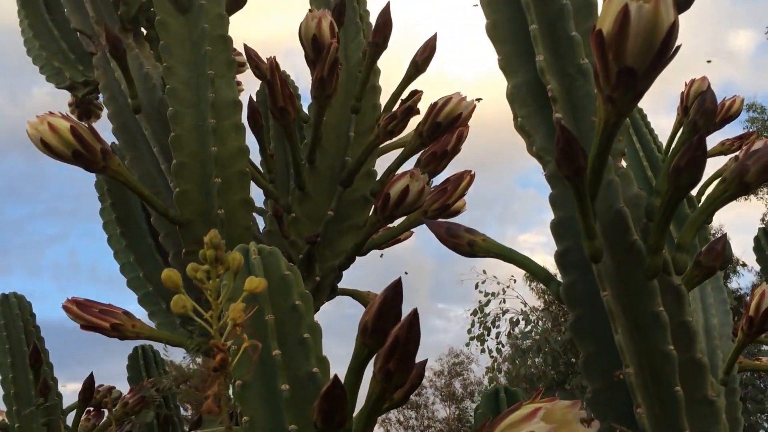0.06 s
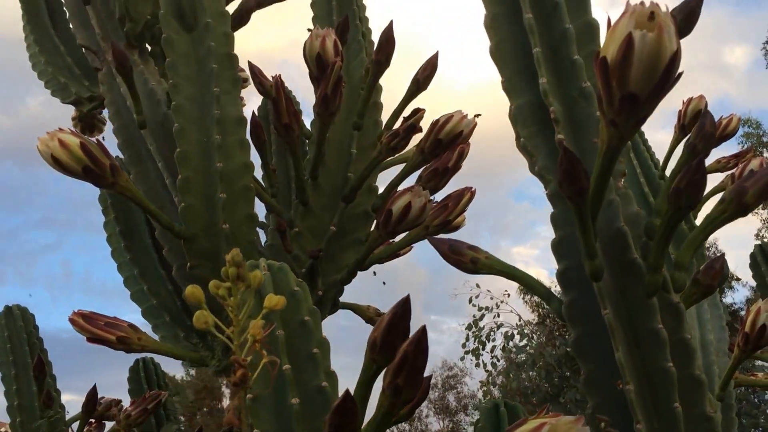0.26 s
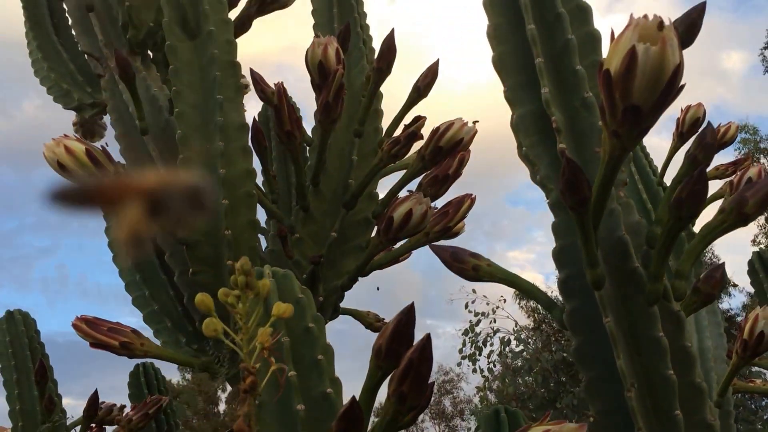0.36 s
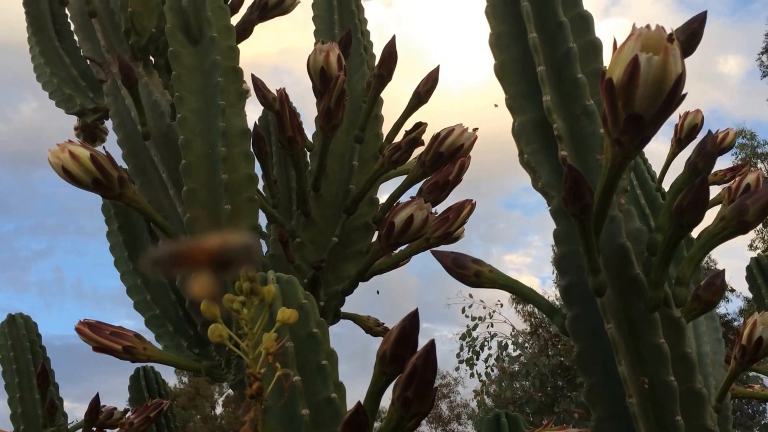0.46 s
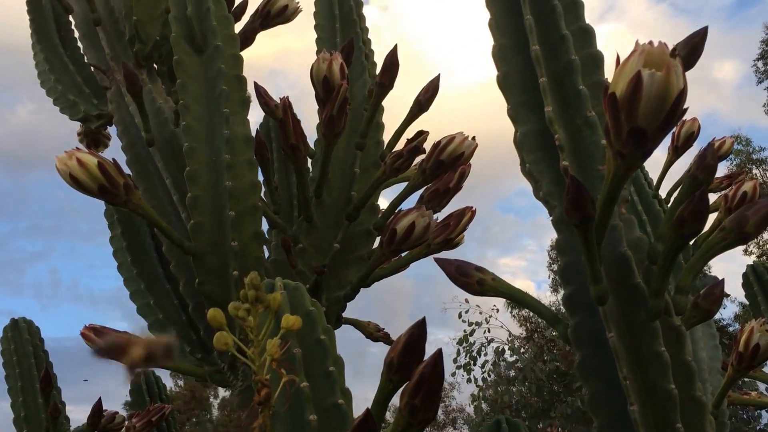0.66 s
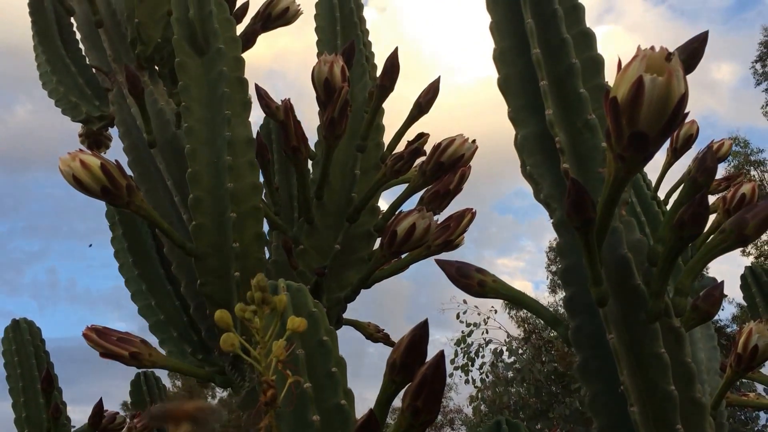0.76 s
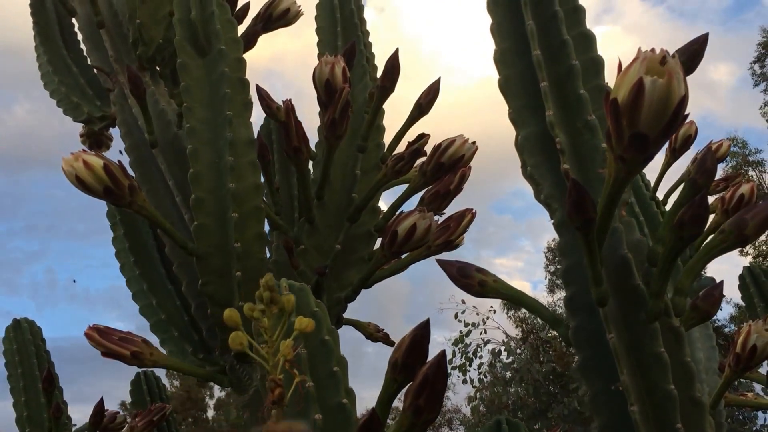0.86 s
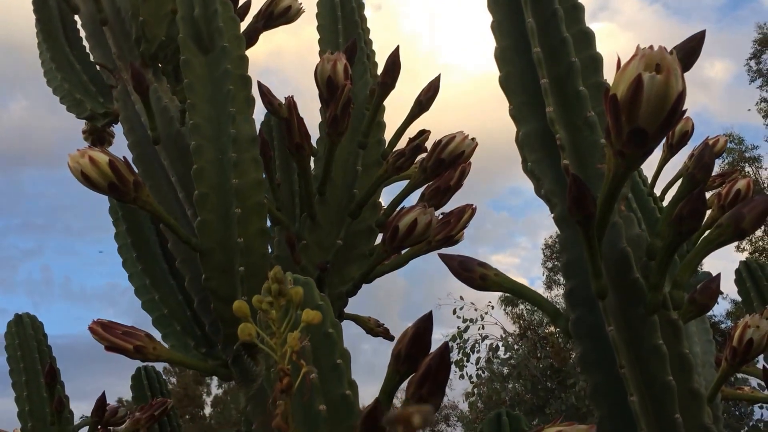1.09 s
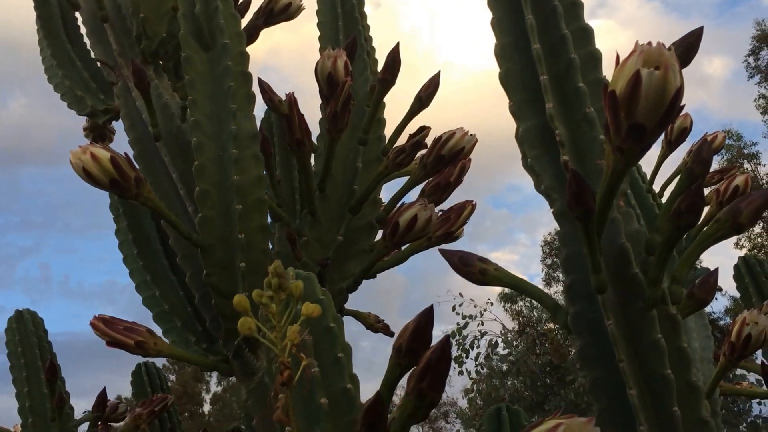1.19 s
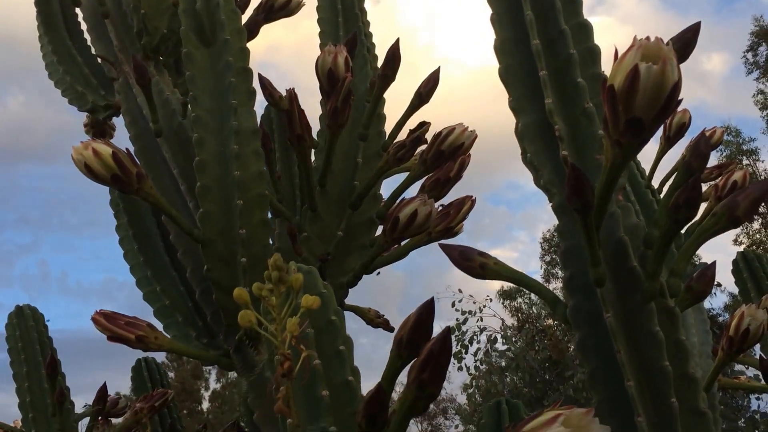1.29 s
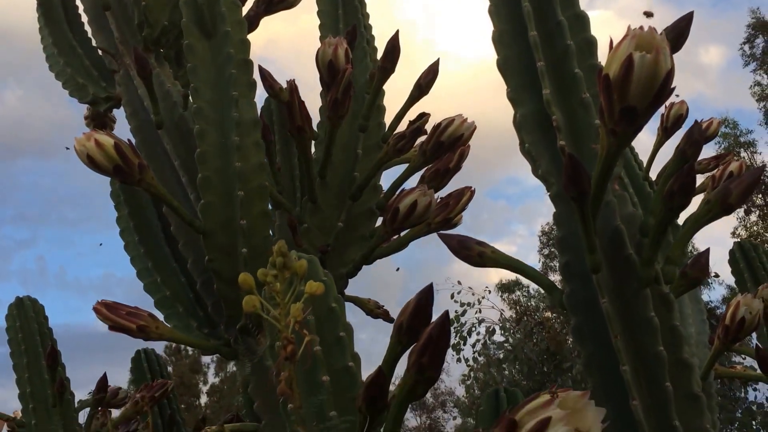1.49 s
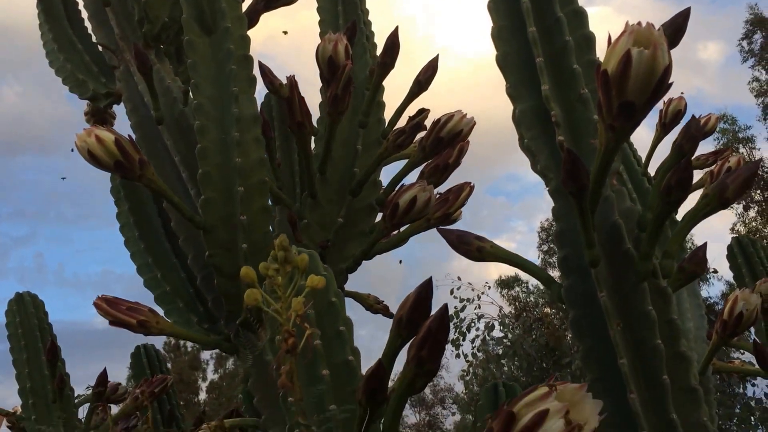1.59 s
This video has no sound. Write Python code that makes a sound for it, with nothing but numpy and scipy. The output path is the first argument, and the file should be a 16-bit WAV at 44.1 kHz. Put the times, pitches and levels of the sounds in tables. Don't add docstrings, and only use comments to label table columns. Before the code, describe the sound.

A bee, faint at first, swells from about 0.15 seconds into a loud, low, raspy buzz very near the microphone at 0.28. Its wing wind blasts and thumps the microphone until about 0.34. The buzz turns duller and wavers away by 0.7. Until about 1.6 seconds, faint distant bees come and go over quiet open-air hiss, soft low wind and a few tiny bumps.

```python
import sys
import numpy as np
from scipy import signal
from scipy.fft import rfft, irfft
from scipy.io import wavfile
from scipy.ndimage import uniform_filter1d

SR = 44100
rng = np.random.default_rng(int(sys.argv[2]) if len(sys.argv) > 2 else 0)


def boost_factor(decibels):
    exponent = np.asarray(decibels, float) / 20
    return 10 ** exponent


def pcm_store(signal):
    levels = np.round(np.clip(np.atleast_2d(signal), -1, 1) * 32767)
    wavfile.write(sys.argv[1], SR, levels.astype(np.int16).T)


N = 72765
T = np.arange(N) / SR


def evened(x):
    return x / np.sqrt(np.mean(x ** 2) + 1e-20)


def noise(shape):
    hz = np.fft.rfftfreq(N, 1 / SR)
    shape_hz, shape_db = np.transpose(shape)
    gain = boost_factor(np.interp(np.log(hz + 1), np.log(shape_hz + 1), shape_db, -90))
    return evened(irfft(rfft(rng.standard_normal(N)) * gain, N))


def drift(rate_hz):
    t = T[::32]
    rates = np.geomspace(rate_hz / 12, rate_hz, num=16)
    waves = sum(np.sin(2 * np.pi * (f * t + rng.random())) / np.sqrt(f) for f in rates)
    return np.interp(T, t, evened(waves))


# time in seconds, wingbeat in Hz,
# second harmonic in dB, first harmonic in dB, wing-edge rasp and upper harmonics in dB.
FLIGHT = [
    (0, 281.7, -59, -56, -72),
    (.035, 275.3, -64, -64, -68),
    (0.113, 276.8, -53.5, -52, -65),
    (0.167, 261.4, -49, -52, -64.5),
    (0.199, 278.4, -40, -40.5, -59),
    (0.276, 283, -23, -24, -50),
    (0.286, 280, -33, -30, -47.5),
    (0.315, 272, -29.5, -44, -55),
    (0.333, 267.1, -36.5, -53, -58),
          (0.361, 262.8, -39.5, -54, -58.5),
    (.42, 277, -45.5, -51.5, -57.5),
    (0.451, 280.4, -53.5, -61.5, -61.5),
    (.49, 278.4, -55, -62, -57),
    (.522, 263.4, -54, -68, -58.5),
    (.545, 264.9, -63.5, -84, -68),
    (.6, 280.7, -56, -71, -60.5),
    (0.682, 271.5, -61, -75, -65.5),
    (.76, 264, -74, -84, -67.5),
]
# multiple of the wingbeat, level in dB from the front, in dB from behind.
UPPER_HARMONICS = [(3, -2, -4), (4, 3, -9), (5, 3, -9), (6, -6, -11), (7, -12, -12), (8, -8, -12),
                   (9, -3, -13), (10, -4, -8), (11, -7, -10), (12, -10, -10), (13, -13, -11),
                   (14, -12, -14), (15, -14, -15), (16, -14, -16), (17, -16, -18), (18, -17, -17),
                   (19, -17, -18)]
# frequency in Hz, density in dB per Hz.
RASP_SPECTRUM = [(1200, -3), (2300, -6), (2700, 1.5), (4000, -9.5), (5600, -6), (7300, -2.5), (10500, -6),
                 (15300, -4)]


def bee():
    pass_s, turn_s, leave_s = 0.36, 0.052, 0.24
    flutter_db, shiver_rad = 1.8, 0.5
    s, *tracks = np.transpose(FLIGHT)
    tracks = [uniform_filter1d(np.interp(T, s, track), size=300) for track in tracks]
    wingbeat_hz, second_db, first_db, rasp_db = tracks

    phase = 2 * np.pi * np.cumsum(wingbeat_hz) / SR
    low = boost_factor(first_db) * np.sin(phase) + boost_factor(second_db) * np.sin(2 * phase + np.pi)

    behind = 0.5 + 0.5 * np.tanh((T - pass_s) / turn_s)
    upper = 0
    for k, front_db, back_db in UPPER_HARMONICS:
        follow = 0.32 if k < 6.5 else 0.18
        level_db = front_db + behind * (back_db - front_db) + follow * (second_db + 37.5)
        level_db = level_db + flutter_db * drift(44.6)
        upper = upper + boost_factor(level_db) * np.sin(k * phase + shiver_rad * np.sqrt(k / 8) * drift(70.8))

    puffs = noise(RASP_SPECTRUM) * (1 + np.cos(2 * phase) + 0.28 * np.cos(phase))
    gone = np.exp(-np.maximum(T - s[-1], 0) / leave_s)
    tones = np.sqrt(2) * (low + boost_factor(rasp_db - 0.5) * upper)
    return gone * (tones + boost_factor(rasp_db + 1.0) * puffs)


# time in seconds, level in dB.
DOWNWASH = [
    (.268, -61),
    (0.283, -28),
    (.3, -25),
    (.312, -32),
    (.326, -27.5),
    (0.34, -41),
    (.39, -40),
    (.425, -57.5),
    (.445, -65),
]
# frequency in Hz, density in dB per Hz.
BLAST_SPECTRUM = [(25, -30), (70, 8.5), (160, 8), (550, -0.5), (900, 3), (1300, -8), (2100, -23),
                  (4000, -68)]
# frequency in Hz, density in dB per Hz.
WAKE_SPECTRUM = [(30, -22), (65, -8), (140, 0), (260, -3), (450, -11), (900, -30), (4000, -70)]


def downwash():
    wake_from_s, blend_s = 0.3242, 0.014
    s, db = np.transpose(DOWNWASH)
    late = 1 / (1 + np.exp(-np.clip((T - wake_from_s) / blend_s * 2, -40, 40)))
    air = np.sqrt(1 - late) * noise(BLAST_SPECTRUM) + np.sqrt(late) * noise(WAKE_SPECTRUM)
    lumps_db = 1.2 * drift(147.8)
    return air * boost_factor(np.interp(T, s, db, -120, -120) + lumps_db)


# time in seconds, peak in dB, swirl in Hz (its sign gives
EDDIES = [(0.2817, -13.5, 163, 1.05), (.2860, -22, 215, 1.06), (.2897, -13.5, -470, 2.25),
          (.2930, -19.5, -600, 0.85), (0.2968, -9.5, 392, 0.86), (.3000, -18.5, 750, 1.83),
          (.3043, -16, -560, 1.95), (.3085, -16, -330, 1.06), (0.317, -12, 506, 1.82),
          (0.3216, -19, 400, 1.34), (.3250, -19, 452, 1.25), (0.3294, -19.5, 245, 0.8),
          (0.41, -29, 113, 1.7), (.3025, -31.5, 1900, 1.7), (0.3173, -37, 1250, 1.4),
          (0.279, -29.5, 140, 1.3), (0.974, -50, 103, 2.6), (1.09, -49, 107, 2.2), (1.435, -43, 83, 1.3),
          (1.56, -45.5, 108, 0.78), (1.605, -50, 66, 0.61)]


def eddies():
    out = np.zeros(N)
    for s, db, swirl_hz, cycles in EDDIES:
        u = (T - s) * swirl_hz
        swell = np.exp(-2 * (u / (0.5 * cycles)) ** 2)
        out += boost_factor(db) * swell * np.sin(2 * np.pi * u) * 1.19
    return out


# wingbeat in Hz, level in dB, nearest moment in seconds, stay in seconds.
SWARM = [
    (253.5, -65, 0.61, 0.16),
    (277, -67, 0.9, 0.17),
    (254.5, -69, 0.97, 0.14),
    (277, -67.5, 1.2, 0.11),
    (264.2, -72.5, 1.19, 0.17),
    (241.3, -75, 1.4, 0.38),
    (264, -69.5, 1.404, 0.29),
    (247, -72, 1.45, 0.19),
    (272, -68.5, 0.833, 0.11),
    (218, -79, 1.41, 0.078),
]
# multiple of the wingbeat, level in dB.
FAR_HUM = [(1, -6), (2, 2), (3, -9), (4, -5), (5, -4), (6, -12), (7, -10), (8, -14), (11, -17), (12, -16),
           (13, -14), (14, -16)]


def swarm():
    out = np.zeros(N)
    for wingbeat_hz, db, nearest_s, stay_s in SWARM:
        phase = 2 * np.pi * np.cumsum(wingbeat_hz * (1 + 0.00803 * drift(14))) / SR
        tone = 0
        for k, hum_db in FAR_HUM:
            tone = tone + boost_factor(hum_db + 2.5 * drift(20)) * np.sin(k * phase + 6 * rng.random())
        out += boost_factor(db) * np.sqrt(2) * tone / (1 + ((T - nearest_s) / stay_s) ** 2)
    return out


# frequency in Hz, density in dB per Hz.
RUMBLE_SPECTRUM = [(20, -48), (40, -29), (70, 4), (110, -5.5), (170, -13.5), (280, -19), (600, -78)]
# time in seconds, swell in dB, length in seconds.
GUSTS = [
    (0.082, -2, 0.23),
    (.21, 6.5, 0.12),
    (0.79, 1, 0.044),
    (0.907, -11, .05),
    (1.034, 3.5, 0.053),
    (1.2, -8, 0.096),
    (1.29, 2.5, 0.061),
    (1.48, 4.5, 0.15),
]


def wind():
    gusts_db = sum(db * np.exp(-((T - s) / length_s) ** 2) for s, db, length_s in GUSTS)
    return boost_factor(-59 + 1.0 * drift(25) + gusts_db) * noise(RUMBLE_SPECTRUM)


# frequency in Hz, density in dB per Hz.
AIR_SPECTRUM = [(12, -40), (20, -12.5), (97, 1), (391, -15), (516, -8), (644, -16.5), (1330, -11.5),
                (2310, -21.5), (15300, -25.5)]


def open_air():
    patch_db, sag_db_per_s = 0.6, -2.5
    frames, hz = N // 256 + 5, np.fft.rfftfreq(1024, 1 / SR)
    real, imag, patches = rng.standard_normal((frames, 513, 3)).T
    patches = uniform_filter1d(patches, size=14, axis=0)
    patches = evened(uniform_filter1d(patches, size=14, axis=1))
    shape_hz, shape_db = np.transpose(AIR_SPECTRUM)
    level_db = np.interp(np.log(hz + 1), np.log(shape_hz + 1), shape_db, -90)[:, None]
    treble = np.clip(hz / 2500, 0, 1)[:, None]
    sag_db = sag_db_per_s * (np.arange(frames) * 256 / SR - 1.2) * treble
    z = (real + 1j * imag) * boost_factor(level_db + patch_db * patches + sag_db)
    return boost_factor(-56.5) * evened(signal.istft(z, nperseg=1024, noverlap=768)[1][:N])


def ducking(bee_sound):
    knee_db, squeeze, recover_db_per_s = -38, 0.26, 36
    power_db = 10 * np.log10(abs(uniform_filter1d(bee_sound ** 2, size=600)) + 1e-12)
    fall_db = T * recover_db_per_s
    held_db = np.maximum.accumulate(power_db + fall_db) - fall_db
    over_db = np.maximum(held_db - knee_db, 0)
    return boost_factor(-squeeze * uniform_filter1d(over_db, size=400))


def scene():
    near = bee() + downwash() + eddies()
    far = swarm() + open_air() + wind()
    return (near + ducking(near) * far)[None]


def band_limit(x):
    return signal.sosfilt(signal.butter(12, 16530, fs=SR, output="sos"), x)


def record(dry):
    edge = signal.firwin(1023, 15330, window=("kaiser", 9), fs=SR)
    mix = signal.oaconvolve(dry, edge[None], "same")
    return band_limit(mix)


dry = scene()
out = record(dry)
pcm_store(out)
```